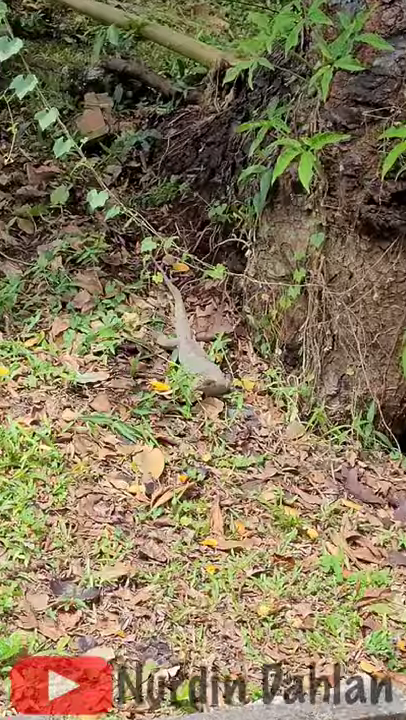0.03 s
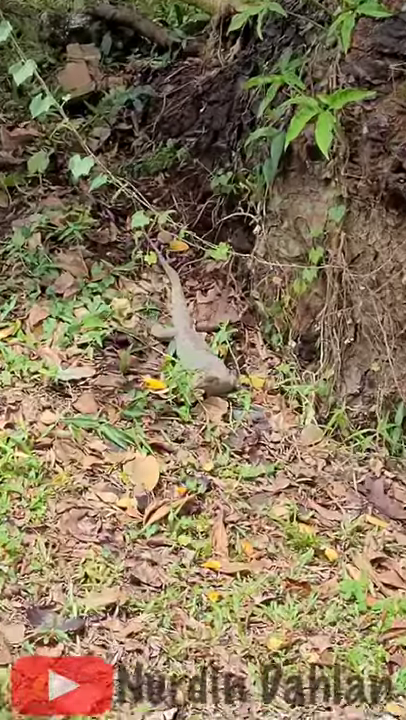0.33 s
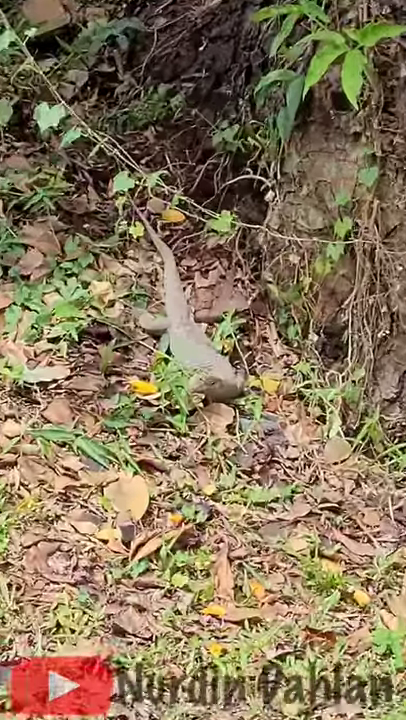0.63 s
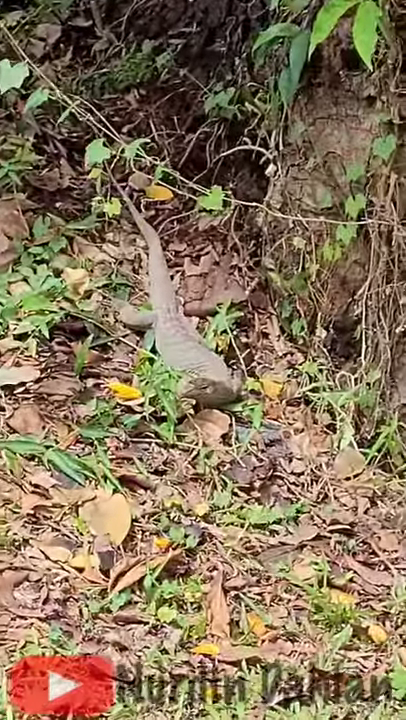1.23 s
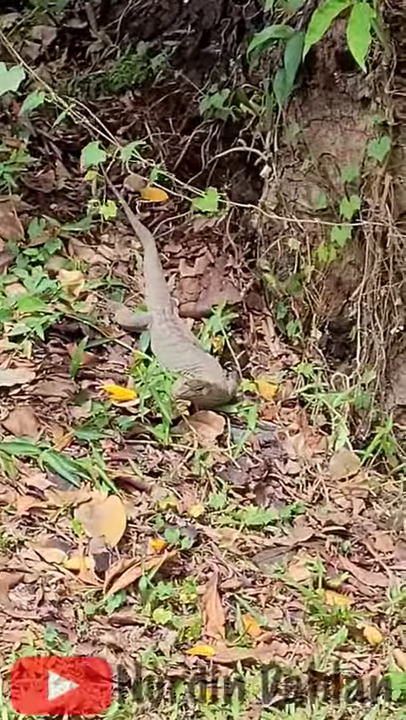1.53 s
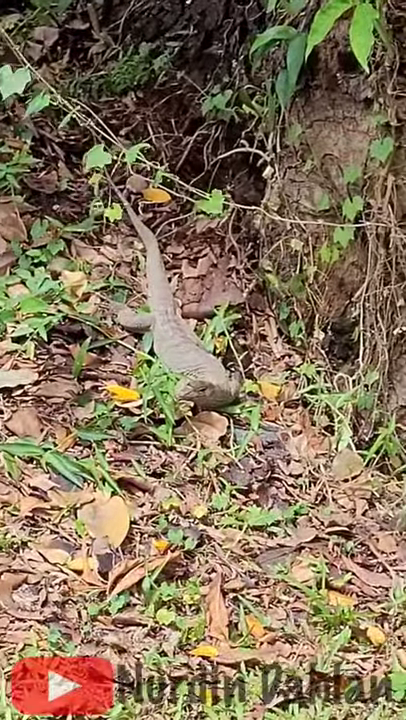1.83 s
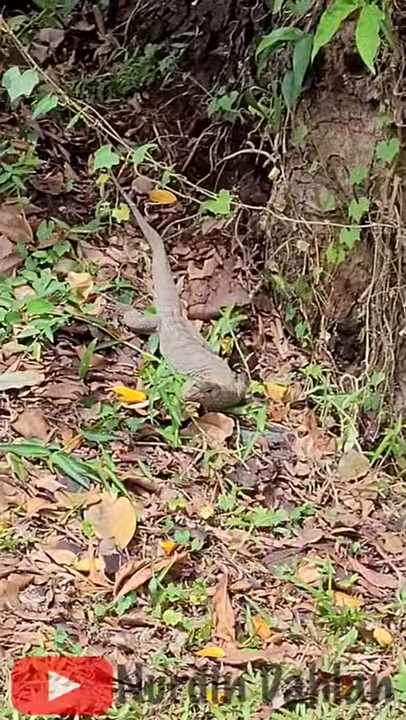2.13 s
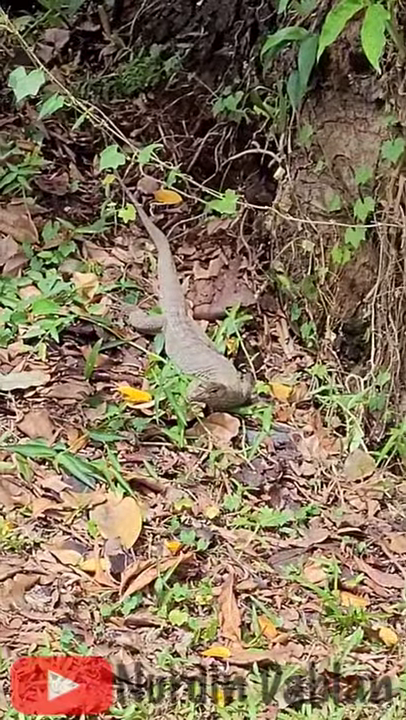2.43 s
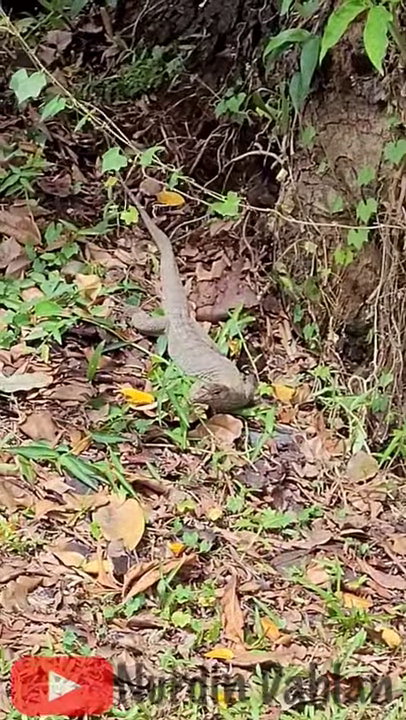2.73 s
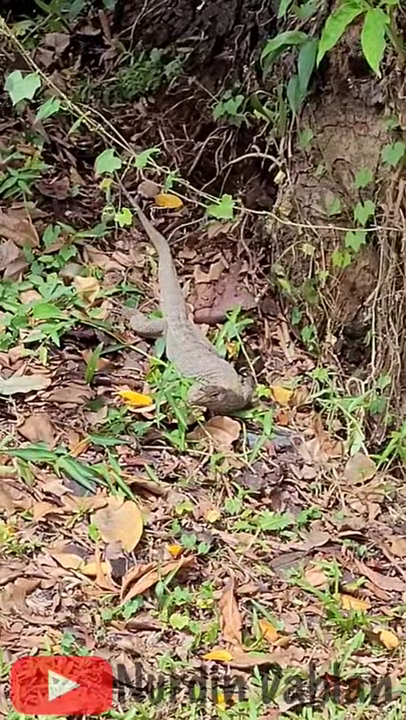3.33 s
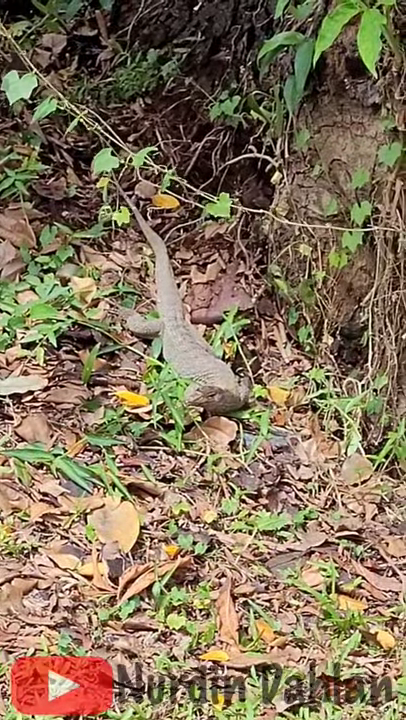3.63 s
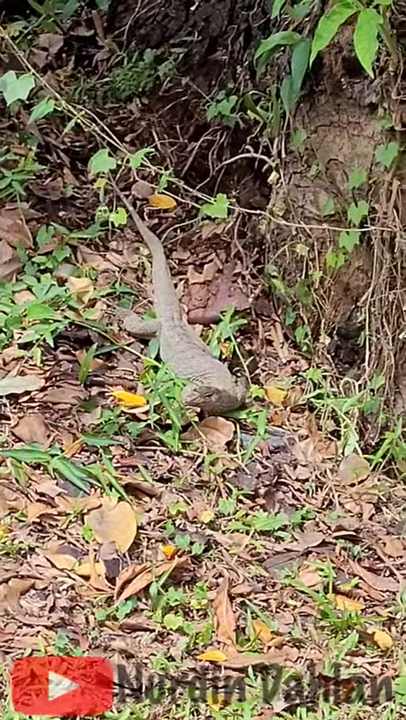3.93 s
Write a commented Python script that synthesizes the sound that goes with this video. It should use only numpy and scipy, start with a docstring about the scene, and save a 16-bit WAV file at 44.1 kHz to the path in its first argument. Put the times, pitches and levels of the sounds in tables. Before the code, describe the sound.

In a wooded spot, an insect near the microphone keeps up a fast, shrill, pulsing trill, left of centre. Behind it are a steady low rumble from a far road, faint distant insects and barely audible bird whistles.

```python
"""A cricket-like insect trills in the leaves close by, left of the microphones, about 19.5 chirps a second.
Each chirp is three wing strokes: a whistle near 7.8 kHz that falls as the wing slows, with its octave
and a dry rasp. Ground, foliage and the wood around scatter the trill. Far off are more of its kind,
a few faint bird whistles and the rumble of traffic. The sound starts after a moment of silence."""
import sys
import numpy as np
from scipy import signal
from scipy.fft import rfft, irfft
from scipy.io import wavfile
from scipy.ndimage import uniform_filter1d

SR = 44100
rng = np.random.default_rng(int(sys.argv[2]) if len(sys.argv) > 2 else 0)


def put_to_file(sound):
    """Save the sound as 16-bit audio at rate SR, in the file named by the first command-line argument."""
    columns = np.atleast_2d(sound).T  # one column per channel
    safe = np.clip(columns, -1, 1)
    whole_steps = np.round(safe * 32767)
    wavfile.write(sys.argv[1], SR, whole_steps.astype(np.int16))


N = 176400
TIME = np.arange(N) / SR
BIN_HZ = np.arange(N // 2 + 1) * SR / N
WOOD_T60_S, WOOD_DB = .63, -10.5  # echo of the wood, for bird and insect alike


def undb(db):
    """Decibels to gain."""
    return 10 ** (np.asarray(db) / 20)


def unit(x):
    """Scale to rms 1."""
    return x / np.sqrt(np.mean(x ** 2))


def spectrum(points):
    """A (Hz, value) table read at every frequency bin."""
    hz, value = np.array(points, float).T
    return np.interp(np.log(BIN_HZ + 1e-9), np.log(hz), value)


def timeline(points):
    """A (seconds, value) table read at every sample."""
    return np.interp(TIME, *np.array(points).T)


def filtered(x, gain):
    """Apply a gain to each frequency bin."""
    return irfft(rfft(x) * gain, N)


def noise(gain):
    """Noise of rms 1, coloured by a gain for each bin."""
    return unit(filtered(rng.standard_normal(N), gain))


def walk(rate):
    """Random levels held 1 / rate seconds and smoothed twice; rms 1."""
    hold = max(int(SR / rate), 2)
    steps = np.repeat(rng.standard_normal(N)[:N // hold + 1], hold)
    return unit(uniform_filter1d(uniform_filter1d(steps, hold), hold)[:N])


def pan(db):
    """Left and right gains for a level difference, left minus right."""
    return undb(np.array([[db], [-db]]) / 2)


def scatter(x, t60):
    """A dying cloud of echoes, different at each microphone, as strong as the sound itself."""
    t = TIME[:SR // 2]
    tails = rng.standard_normal((2, len(t))) * np.exp(-np.log(1000) * t / t60) * (t > .002)
    return np.array([unit(signal.fftconvolve(x, tail)[:N]) for tail in tails]) * x.std()


def traffic():
    """A far road roars, wide in the treble and centred in the bass, with a swelling engine drone."""
    # Each row: frequency in Hz, relative density of the roar in dB.
    road_colour = [(20, -27), (32, -13), (45, -13), (75, -6), (95, -12), (112, -18), (135, -11.5),
                   (165, -15.5), (205, -18.5), (250, -14.5), (310, -19), (400, -25), (600, -27),
                   (850, -23.5), (1100, -24.5), (1500, -31), (2200, -38), (3200, -43), (6000, -54),
                   (14000, -56)]
    # Each row: frequency in Hz, correlation between the two microphones.
    likeness = [(60, 0.8), (130, .97), (250, 0.99), (500, 0.58), (1000, 0.19), (3000, 0.019)]
    # Each row: time in seconds, change in the roar's level in dB.
    road_level = [(0, 0.4), (.8, 0.65), (1.6, 0.5), (2.3, -0.17), (3.2, -0.26), (4, -.4)]
    # Each row: an engine's pitch in Hz, its wander in Hz, its level in dB.
    engines = [(60.53, 4.12, -38), (77.15, 5.96, -44)]
    # Each row: time in seconds, relative level of the drone in dB.
    drone_level = [(0.15, -43.5), (0.25, -32), (0.4, -55), (0.62, -33), (1.02, -38), (1.19, -35.5),
                   (1.38, -49), (1.43, -47), (1.46, -41.5), (1.76, -33.5), (1.97, -39.5), (2.09, -28.5),
                   (2.13, -55), (2.28, -34.5), (2.71, -37.5), (2.72, -45), (3.01, -35), (4.0, -40.5)]
    colour, alike = undb(spectrum(road_colour)), spectrum(likeness)
    mid = filtered(rng.standard_normal(N), colour * np.sqrt(1 + alike))
    side = filtered(rng.standard_normal(N), colour * np.sqrt(1 - alike))
    road_db = -35.5 + timeline(road_level) - .1 * walk(3.2) + .83 * walk(18)  # slight sway, quick flutter
    road = unit(np.array([mid + side, mid - side])) * undb(road_db)
    drone = np.zeros(N)
    for hz, wander_hz, db in engines:
        phase = 2 * np.pi * np.cumsum(hz + wander_hz * walk(24.96)) / SR
        drone += undb(db) * np.sqrt(2) * np.sin(phase)
    swell = unit(undb(timeline(drone_level)))
    return (road + swell * drone) * pan(-1.2)


def wood():
    """Far insects merge into a thin whistle over the soft hiss of the wood."""
    # Each row: frequency in Hz, relative density of the hiss in dB.
    hiss_colour = [(1500, -5), (3500, 0.5), (6500, -0.5), (9500, -3), (12000, -3.5), (14000, -14),
                   (15500, 1)]
    chorus_hz, half_width_hz = 7806, 81
    band = 1 / (1 + ((BIN_HZ - chorus_hz) / half_width_hz) ** 4)
    chorus = np.array([noise(band) for _ in range(2)])
    hiss = np.array([noise(undb(spectrum(hiss_colour))) for _ in range(2)])
    return undb(-58) * (chorus + hiss * pan(-.5))


def bird():
    """A bird far off in the wood gives soft-edged whistles of steady pitch, a little to the right."""
    # Each row: start in seconds, length in seconds, pitch in Hz, level in dB.
    whistles = [(.8, .11, 2520, -68), (.86, .09, 2860, -68), (1.03, .2, 2528, -64), (3.17, .08, 3300, -63)]
    notes = np.zeros(N)
    for start, length, hz, db in whistles:
        arch = np.sin(np.pi * np.clip((TIME - start) / length, 0, 1))
        notes += undb(db) * np.sqrt(2) * arch * np.sin(2 * np.pi * hz * TIME)
    return notes * pan(-2) + undb(WOOD_DB) * scatter(notes, WOOD_T60_S)


def wings():
    """The scraper runs over the file; the tooth rate is the pitch and falls as the wing slows."""
    # Each row: time in seconds, chirps counted so far.
    pace = [(.152, 0), (1.0198, 17), (2.0375, 37), (2.3469, 43), (2.7098, 50), (3.3748, 63), (4.0355, 76)]
    # The strokes of one chirp. Each row: start from the chirp's centre in ms, length in ms, first and
    # last pitch in Hz, relative level in dB, octave trim in dB, unevenness of the start from 0 to 1.
    strokes = [(-15.6, 8.6, 8050, 7700, -4.8, -9, .2), (-4.1, 7.3, 7930, 7570, 0, 0, .2),
               (8.3, 7.8, 8280, 7550, -.8, -.5, .9)]
    # The wing radiates through a broad main resonance and a sharp one at the octave.
    # Each row: frequency in Hz, gain in dB.
    resonances = [(6800, -22), (7350, -12), (7550, -1), (7690, -1), (7810, 3), (7920, -3), (8060, 2),
                  (8320, 2), (8700, -8), (14450, -12), (14800, -4), (15080, -6), (15300, 2), (15440, 5),
                  (15510, -12), (16000, -22)]
    # Each row: frequency in Hz, relative density of the rasp in dB.
    rasp_colour = [(2500, -8), (5000, -2), (7000, -1.5), (8700, 7), (9600, -3.5), (11200, -0.5),
                   (13000, -11), (14000, -10), (14700, 1.5), (15350, -6), (15650, -14.5)]
    time_scatter_ms, pitch_scatter, level_scatter_db = .25, .001, .7
    catch_hz = 148  # a stroke may set off faster or slower, the closing one most of all
    slowing, edge_share = 1.5, .55  # curve of the fall; share of a stroke spent fading in and out
    times, counts = np.array(pace).T
    centres = np.interp(np.arange(counts[-1] + 1), counts, times)
    jitter_hz, grip = 70 * walk(1500), 1 + .12 * walk(1200)  # uneven teeth
    song, contact = np.zeros(N), np.zeros(N)
    for start_ms, length_ms, first_hz, last_hz, db, octave_db, uneven in strokes:
        for centre, luck in zip(centres, rng.standard_normal((len(centres), 6))):
            start = centre + (start_ms + time_scatter_ms * luck[0]) / 1000
            length = length_ms / 1000
            span = slice(*np.searchsorted(TIME, [start, start + length]))
            progress = np.clip((TIME[span] - start) / length, 0, 1)
            fall_hz = first_hz - last_hz + uneven * catch_hz * luck[2]
            hz = last_hz * (1 + pitch_scatter * luck[1]) + fall_hz * (1 - progress) ** slowing
            phase = 2 * np.pi * (np.cumsum(hz + jitter_hz[span]) / SR + luck[3])
            ramp = np.minimum(2 * np.minimum(progress, 1 - progress) / edge_share, 1)
            press = np.sin(np.pi / 2 * ramp) * undb(db + level_scatter_db * luck[4])
            octave = undb(.5 + octave_db + level_scatter_db * luck[5]) * np.sin(np.pi * progress) ** 2
            song[span] += np.sqrt(2) * press * (grip[span] * np.sin(phase) + octave * np.sin(2 * phase))
            contact[span] += press
    tone = filtered(song, undb(spectrum(resonances)))
    rasp = undb(-11.5) * contact * noise(undb(spectrum(rasp_colour)))
    return undb(-41.5) * (tone + rasp)


def insect():
    """The trill reaches the microphones straight, off the ground, through near leaves and from the wood."""
    # The listener comes round to the insect. Each row: time in seconds, gain in dB.
    approach = [(0, -0.5), (1.2, 0.9), (2.6, 2.3), (4, 1.6)]
    # Its side as the listener turns. Each row: time in seconds, left minus right in dB.
    bearing = [(0, 16), (1.2, 15), (2.5, 6), (4, 9)]
    # Each row: frequency in Hz, lead of the left microphone over the right in radians.
    left_lead = [(4000, .6), (7700, 1.2), (8500, 1.9), (11000, 1.2), (14800, -.6)]
    # Foliage throws back less of the octave. Each row: frequency in Hz, gain in dB.
    foliage = [(11000, 0), (15000, -3)]
    ground_delay_ms = 2.6
    song = wings() * undb(timeline(approach))
    right = filtered(song, np.exp(-1j * spectrum(left_lead))) * undb(-timeline(bearing))
    direct = np.array([song, right])
    dull = filtered(song, undb(spectrum(foliage)))
    ground = undb(-17) * np.roll(dull, int(ground_delay_ms * SR / 1000)) * np.array([[.5], [1]])
    leaves = undb(-10) * scatter(dull, t60=.035)
    return direct + ground + leaves + undb(WOOD_DB) * scatter(dull, WOOD_T60_S)


def scene():
    """The near insect over the wood, a far bird and the far road."""
    return insect() + wood() + bird() + traffic()


def record(dry):
    """The microphones open after a moment of silence; a steep low-pass cuts the top."""
    start_s, fade_s, top_hz = .13, .017, 15850
    opened = dry * np.clip((TIME - start_s) / fade_s, 0, 1)
    return signal.sosfilt(signal.ellip(10, .2, 80, top_hz, fs=SR, output="sos"), opened)


dry = scene()
out = record(dry)
put_to_file(out)
```